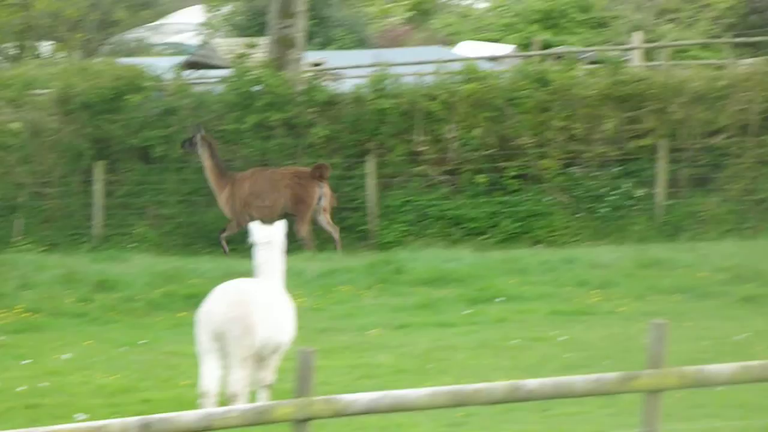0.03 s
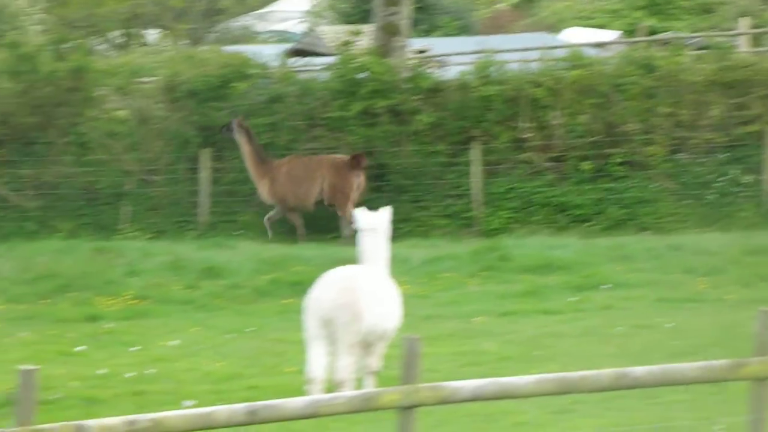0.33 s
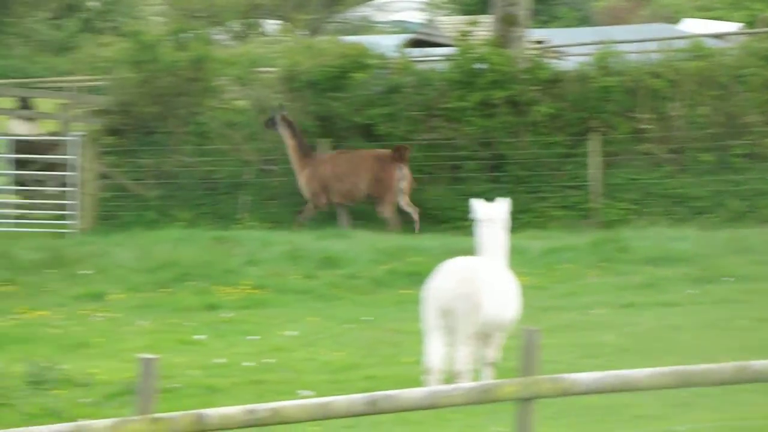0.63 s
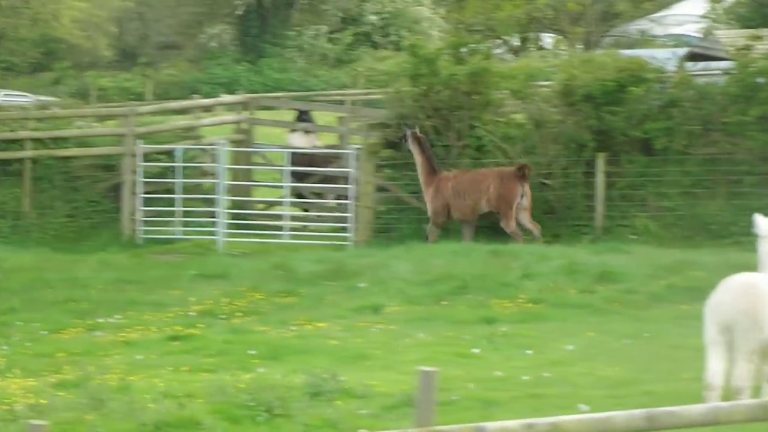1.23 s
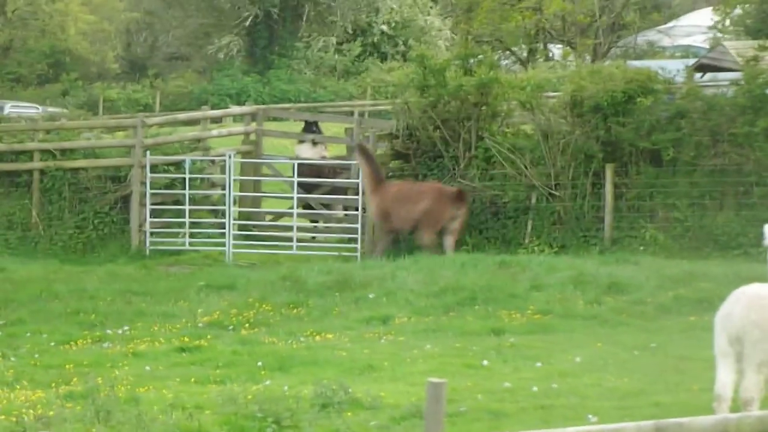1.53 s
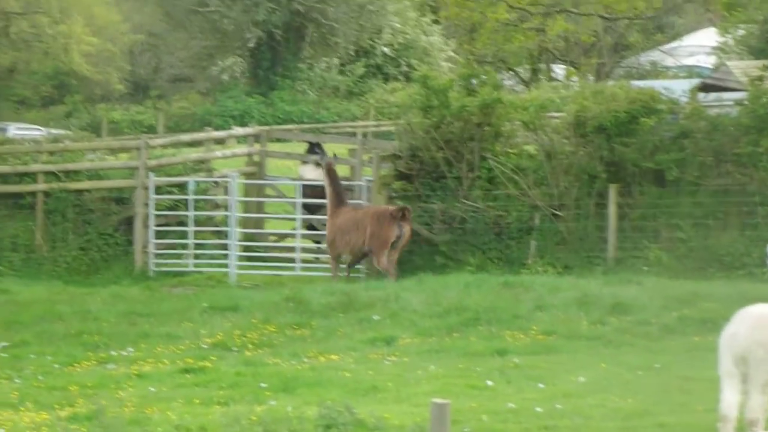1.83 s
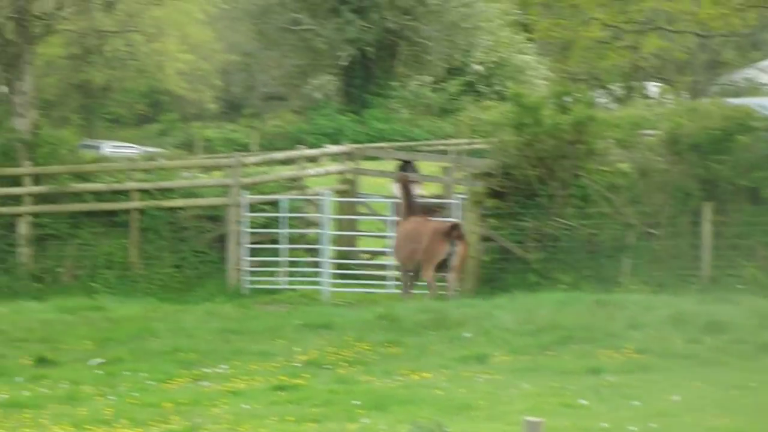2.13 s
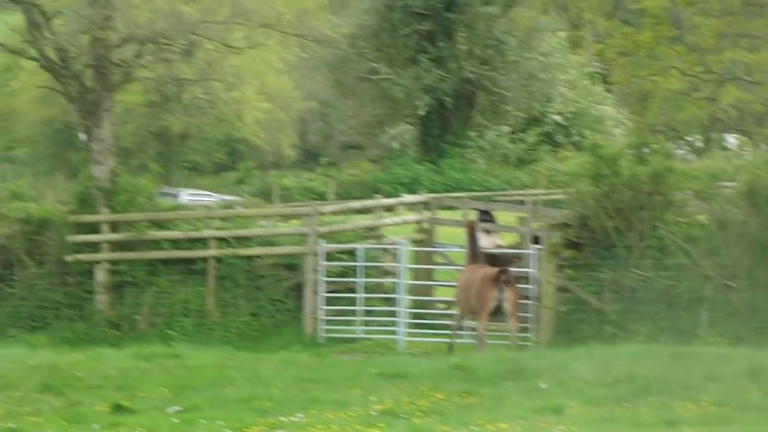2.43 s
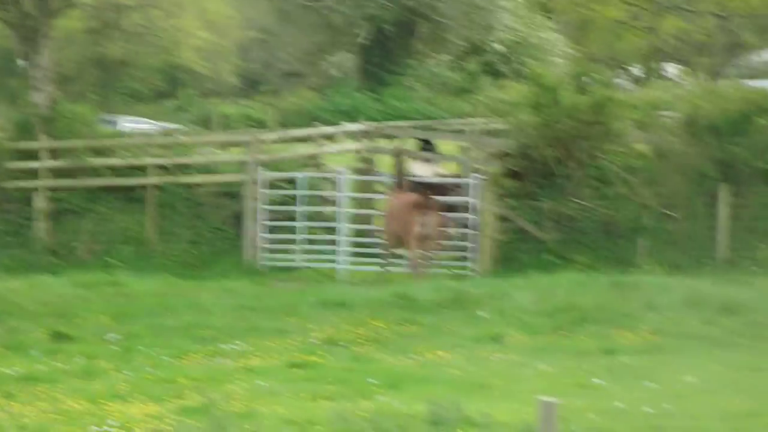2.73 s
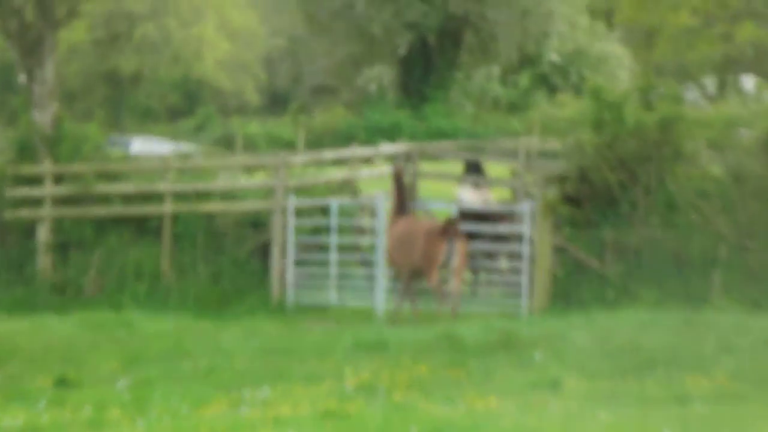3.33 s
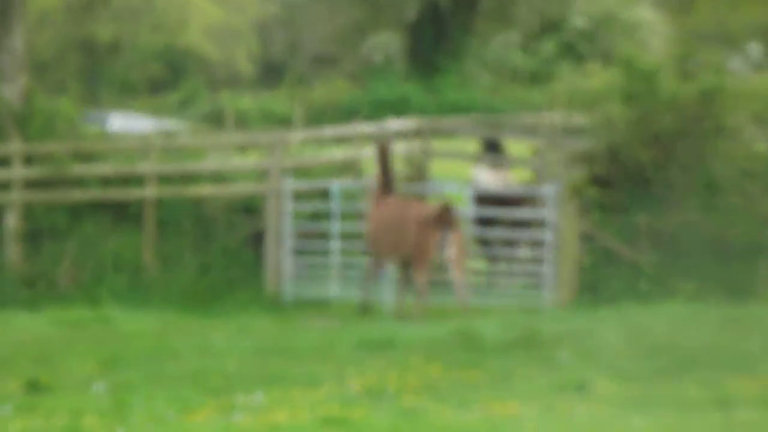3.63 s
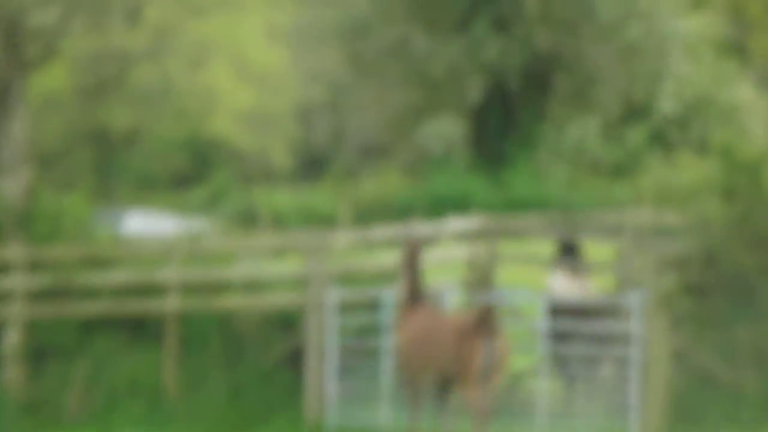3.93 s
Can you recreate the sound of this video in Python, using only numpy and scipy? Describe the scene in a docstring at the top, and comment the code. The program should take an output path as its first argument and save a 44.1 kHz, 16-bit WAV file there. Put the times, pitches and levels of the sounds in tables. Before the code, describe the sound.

Rumbling, gusty wind on a handheld camera's microphone, with case clicks and a late motor rasp.

```python
"""Wind on a handheld camera's microphone in a paddock: rumble, fluttering gusts, puffs, overload thumps.
Handling snaps ring the camera's case hard enough to clip, with soft rubs and a faint creak.
Near the end, a rough rasp, most likely the zoom motor: about 220 ticks a second over gear hiss.
Behind it: faint ticks of a far bird, steady hiss and the camera's thin whine."""
import sys
import numpy as np
from scipy import signal
from scipy.fft import rfft, irfft
from scipy.io import wavfile
from scipy.ndimage import uniform_filter1d

SR = 44100
rng = np.random.default_rng(int(sys.argv[2]) if len(sys.argv) > 2 else 0)


def transcribe(signal):
    """Save signal, clipped to [-1, 1], as a 16-bit WAV file at the path in sys.argv[1]."""
    frames = np.atleast_2d(signal).T
    limited = np.clip(frames, -1, 1)
    pcm = np.round(limited * 32767).astype(np.int16)
    wavfile.write(sys.argv[1], SR, pcm)


N = 176400

# Wind pressure on the microphone (time [s], relative level [dB])
RUMBLE_LEVEL = [(0.0, -18.5), (0.53, -22.5), (0.71, -14), (0.85, -26), (0.88, -18), (0.95, -22),
                (1.14, -15.5), (1.27, -24.5), (1.31, -15.5), (1.36, -21.5), (1.5, -31), (1.76, -21.5),
                (1.82, -16.5), (2.02, -24), (2.09, -17.5), (2.22, -23), (2.27, -16), (2.44, -27.5),
                (2.55, -15), (2.57, -23.5), (2.73, -14), (2.78, -23), (2.95, -25), (3.01, -16), (3.23, -14),
                (3.56, -20.5), (3.62, -15), (3.83, -18), (3.9, -7.5), (4.0, -21.5)]
# Gust strength (time [s], relative level [dB])
GUST_LEVEL = [(0.0, -57), (0.014, -28.5), (0.068, -28.5), (0.178, -44.5), (0.394, -32.5), (0.632, -40.5),
              (0.696, -30), (0.844, -42), (0.868, -22.5), (1.166, -24), (1.278, -39), (1.29, -31.5),
              (1.35, -38), (1.43, -28.5), (1.45, -38.5), (1.5, -24.5), (1.76, -41), (1.8, -24.5),
              (1.84, -42), (1.95, -30), (1.98, -44.5), (2.14, -18.5), (2.18, -46), (2.21, -17.5),
              (2.35, -29.5), (2.37, -48), (2.48, -37), (2.5, -24.5), (2.57, -32.5), (2.71, -16.5),
              (2.83, -37), (2.9, -29), (2.93, -46), (3.04, -21.5), (3.42, -25), (3.45, -41), (3.5, -27.5),
              (3.73, -24), (3.74, -17), (3.78, -30), (3.98, -20), (4.0, -29)]
# Rumble spectrum (frequency [Hz], relative density [dB])
RUMBLE_SPECTRUM = [(5, -29), (18, 0.5), (32, 1.5), (70, 0), (115, -3), (170, -10.5), (300, -34),
                   (700, -57.5), (2000, -90)]
# Gust spectrum (frequency [Hz], relative density [dB])
GUST_SPECTRUM = [(30, -14), (90, -7), (150, 2), (240, -3), (400, -12), (700, -24), (1200, -39), (2500, -92),
                 (8000, -98)]
# Puffs into the microphone port (time [s], length [s], centre [Hz], width [Hz], level [dB])
PUFFS = [(0.868, 0.038, 330, 110, -14.5), (1.018, .04, 310, 112, -19), (2.108, 0.026, 276, 109, -13),
         (2.198, 0.028, 330, 120, -18), (2.203, 0.036, 754, 282, -23), (3.178, 0.043, 507, 222, -22.5)]
# Microphone overloads (time [s], thump [dB], crack [dB])
BUFFETS = [(0.71, -6, -14), (0.8872, -1.5, -10), (1.0515, 0.5, -15), (1.139, -3.5, -13.5),
           (1.1567, -3, -11), (2.1139, -2, -9.5), (2.615, -4, -10.5), (2.7024, -4, -14), (2.722, -5, -14.5),
           (3.0331, -3.5, -10.5), (3.096, -3, -11), (3.1251, -4, -13), (3.2115, -4.5, -13),
           (3.307, -3.5, -14), (3.6295, -5.5, -13), (3.8941, -6.5, -12), (3.9103, -6.5, -13.5)]
# Contacts on the case (time [s], level [dB], main ring [Hz], contact low-pass [Hz])
SNAPS = [(0.7767, 3.5, 2990, 14100), (0.7781, -0.5, 2800, 7960), (0.781, -19, 3130, 3500),
         (0.787, -9, 3060, 6950), (0.8597, -20.5, 2920, 5950), (0.865, -19.5, 2860, 5500),
         (0.9165, -32.5, 2930, 10000), (1.3173, 13.5, 2986, 13200), (1.847, -1.5, 2904, 12500),
         (2.3625, -3.5, 2830, 12200), (2.3629, -3.5, 2810, 7960), (2.4104, -29, 3060, 5500),
         (2.546, -3, 3040, 14000), (2.585, -25, 3150, 5530), (2.692, -22.5, 2700, 3500),
         (2.7851, -7, 2750, 2400), (2.7877, -11, 2950, 2900), (2.92, -24, 2910, 3420),
         (2.964, -23.5, 2380, 2950)]
# Case modes, retuned per snap (nominal frequency [Hz], relative level [dB], t60 [s])
CASE_MODES = [(2925, 5, 0.0097), (1840, -21.5, 0.01), (2860, -32, 0.0083), (3400, 3, 0.0054),
              (4800, -1.5, 0.0051), (7580, -6.5, 0.0076), (8200, -5, .005), (9900, -16, 0.0024),
              (11300, -5, 0.0025), (12200, -5, 0.004)]
# Zoom motor speed (time [s], tick rate [Hz])
MOTOR_SPEED = [(3.05, 165), (3.063, 186), (3.07, 314), (3.095, 256), (3.112, 180), (3.14, 207), (3.21, 218),
               (3.31, 233), (3.345, 188), (3.39, 235), (3.49, 216), (3.6, 209), (3.72, 218), (3.96, 226)]
# Zoom motor level (time [s], ticks [dB], gear hiss [dB])
MOTOR_LEVEL = [(3.048, -46, -67), (3.058, -13, -41), (3.072, -24.5, -31), (3.085, -28, -35),
               (3.135, -31.5, -42), (3.21, -27.5, -39), (3.255, -32, -42), (3.298, -28, -34.5),
               (3.325, -35.5, -41.5), (3.383, -27.5, -39), (3.465, -33, -41), (3.525, -26, -30.5),
               (3.58, -28, -31.5), (3.635, -30, -41.5), (3.72, -28.5, -35), (3.79, -28.5, -34),
               (3.855, -27.5, -28), (3.91, -27.5, -39), (3.94, -38, -47), (3.97, -55, -64)]
# Gear hiss spectrum (frequency [Hz], relative density [dB])
GEAR_SPECTRUM = [(1200, -9), (2200, 8), (2750, 9), (3300, 12.5), (3800, -0.5), (4400, -12), (4900, 0.5),
                 (5250, -1.5), (5550, -6), (5950, 4), (6400, 2.5), (6800, -15), (7250, 2.5), (7600, -3),
                 (7950, -7), (8700, -7), (9200, -6.5), (10400, -18), (11200, -31), (16000, -42)]
# Rubs and rustles (time [s], length [s], centre [Hz], width [Hz], level [dB])
RUBS = [(0.03, 0.08, 7500, 1100, -49), (0.383, .09, 6700, 900, -54), (0.55, 0.057, 7600, 1200, -53),
        (0.655, 0.19, 7540, 1100, -48.5), (0.783, 0.043, 5160, 550, -37), (0.864, 0.014, 4750, 900, -47),
        (1.258, 0.053, 7600, 1200, -45), (1.73, 0.15, 7400, 1200, -51), (2.15, 0.18, 6100, 1600, -53),
        (2.555, 0.13, 5100, 800, -46.5), (2.64, .08, 2850, 220, -32.5), (2.96, .07, 6800, 1200, -48.5)]
# Far bird's ticks (time [s], level [dB])
BIRD_TICKS = [(0.146, -42), (0.171, -43), (0.206, -46), (0.236, -49), (2.227, -45), (2.274, -47)]
# Background hiss spectrum (frequency [Hz], relative density [dB])
HISS_SPECTRUM = [(100, 1), (500, -0.5), (1000, -2), (1500, 1), (2300, 0.5), (2700, 3), (2920, 10),
                 (3130, 3), (3350, 2.5), (3600, -5), (4100, -13), (4900, -24), (6000, -21), (7200, -17.5),
                 (8000, -12), (8700, -23.5), (11000, -27), (15000, -33), (16500, -48.5)]


def amp(db):
    """Decibels to gain."""
    return 10 ** (np.asarray(db) / 20)


def unit_rms(x):
    """Scales to rms 1."""
    return x / np.sqrt(np.mean(x ** 2) + 1e-20)


def curve(table, column=1):
    """One column of a time table at every sample."""
    rows = np.array(table)
    return np.interp(np.arange(N) / SR, rows[:, 0], rows[:, column])


def add(mix, time_s, sound):
    """Mixes a sound in at time_s."""
    part = mix[max(round(time_s * SR), 0):][:len(sound)]
    part += sound[:len(part)]


def shaped_noise(spectrum):
    """Noise with the given spectrum, rms 1."""
    points_hz, points_db = np.transpose(spectrum)
    hz = np.fft.rfftfreq(N, 1 / SR)
    gain = amp(np.interp(np.log(hz + 1), np.log(points_hz), points_db))
    return unit_rms(irfft(rfft(rng.standard_normal(N)) * gain, N))


def band_noise(centre_hz, width_hz):
    """Noise in one Gaussian band, rms 1."""
    hz = np.fft.rfftfreq(N, 1 / SR)
    gain = np.exp(-.5 * ((hz - centre_hz) / width_hz) ** 2)
    return unit_rms(irfft(rfft(rng.standard_normal(N)) * gain, N))


def steadied(x, span_s):
    """Evens out swells slower than span_s."""
    power = uniform_filter1d(x ** 2, max(int(span_s * SR), 2))
    return x / np.sqrt(abs(power) + 1e-9)


def bursts(table):
    """Short rounded noise bursts, each in its own band."""
    out = np.zeros(N)
    for time_s, length_s, centre_hz, width_hz, db in table:
        window = np.hanning(int(length_s * SR)) ** .5
        add(out, time_s, amp(db) * window * unit_rms(band_noise(centre_hz, width_hz)[:len(window)]))
    return out


def wind(rumble_gain_db=2, gust_gain_db=5, flutter_db=4):
    """Deep pressure rumble, fluttering turbulence in the gusts, puffs straight into the port."""
    rumble = steadied(shaped_noise(RUMBLE_SPECTRUM), span_s=.11)
    rumble *= amp(curve(RUMBLE_LEVEL) + rumble_gain_db)
    eddies = shaped_noise(GUST_SPECTRUM) * amp(flutter_db * band_noise(0, width_hz=43))
    gusts = steadied(eddies, span_s=.07) * amp(curve(GUST_LEVEL) + gust_gain_db)
    return rumble + gusts + bursts(PUFFS)


def buffeted(air, thump_width_s=.0017, crack_decay_s=.0018):
    """Each buffet takes over the diaphragm in one low thump and lets go with a small crack."""
    half = SR // 50
    out, t = air.copy(), np.arange(-half, half) / SR
    u = t / thump_width_s
    for time_s, thump_db, crack_db in BUFFETS:
        displaced_air = air[round(time_s * SR) - half:][:len(t)] * np.exp(-.5 * (u / 2) ** 2)
        thump = amp(thump_db) * (1 - u ** 2) * np.exp(-.5 * u ** 2)
        crack = amp(crack_db) * (t >= 0) * np.exp(-abs(t) / crack_decay_s)
        add(out, time_s + t[0], thump - displaced_air - crack)
    return out


def case_snaps(chatter_gain=.092, chatter_decay_s=.0012):
    """A contact and brief chatter ring the case's modes; softer contacts are duller."""
    out, t = np.zeros(N), np.arange(SR // 25) / SR
    for time_s, db, ring_hz, lowpass_hz in SNAPS:
        force = chatter_gain * rng.standard_normal(len(t)) * np.exp(-t / chatter_decay_s)
        force[0] = 1  # first contact
        force = signal.lfilter(*signal.butter(3, lowpass_hz, fs=SR), force)
        tuning = ring_hz / CASE_MODES[0][0]
        ring = sum(amp(mode_db - 60 * t / t60_s) * np.cos(2 * np.pi * hz * tuning * t)
                   for hz, mode_db, t60_s in CASE_MODES)
        snap = signal.fftconvolve(force, ring)[:len(t)]
        onset_amplitude = np.sqrt(2 * np.mean(snap[:SR // 350] ** 2))
        add(out, time_s, amp(db) * snap / onset_amplitude)
    return out


def zoom_motor(ring_hz=2767, width_s=.00056, spread_db=4.5, limp_db=.3, jitter_s=.00012, detune=.015):
    """Uneven ticks, each a few cycles of one resonance, over gear hiss."""
    now, t = np.arange(N) / SR, np.arange(-SR // 300, SR // 300) / SR
    running = (now > MOTOR_LEVEL[0][0]) & (now < MOTOR_LEVEL[-1][0])
    tick_count = np.floor(np.cumsum(curve(MOTOR_SPEED) * running) / SR)
    times_s = now[1:][np.diff(tick_count) > 0]
    gears = shaped_noise(GEAR_SPECTRUM) * amp(curve(MOTOR_LEVEL, column=2))
    scatter = np.clip(rng.standard_normal((len(times_s), 3)), -2, 2)
    window = np.exp(-.5 * (t / width_s) ** 2)
    ticks = np.zeros(N)
    for k, (time_s, (size, late, sharp)) in enumerate(zip(times_s, scatter)):
        tick = window * np.sin(2 * np.pi * ring_hz * (1 + detune * sharp) * t)
        gain = amp(spread_db * size + limp_db * (-1) ** k)
        add(ticks, time_s + t[0] + jitter_s * late, gain * tick)
    ticks *= amp(curve(MOTOR_LEVEL)) / np.std(ticks[running])
    return running * (ticks + gears)


def rubs(grain_db=1.5):
    """Soft, grainy friction noise."""
    return bursts(RUBS) * unit_rms(amp(grain_db * band_noise(0, width_hz=70)))


def creak(start_s=2.223, length_s=.11, pitch_hz=1915, slip_rate_hz=83.6, level_db=-33.5):
    """A quick run of rough slips on one note."""
    out, t = np.zeros(N), np.arange(0, length_s, 1 / SR)
    slips = np.sin(np.pi * slip_rate_hz * t) ** 4 * np.sin(np.pi * t / length_s) ** .5
    note = steadied(band_noise(pitch_hz, width_hz=60), span_s=.0069)[:len(t)]
    add(out, start_s, amp(level_db) * slips * note)
    return out


def bird(decay_s=.005):
    """Thin high ticks from the hedge: fast-decaying narrowband noise."""
    out, t = np.zeros(N), np.arange(SR // 40) / SR
    for time_s, db in BIRD_TICKS:
        note = steadied(band_noise(centre_hz=6750, width_hz=350), span_s=.004)[:len(t)]
        add(out, time_s, amp(db) * np.exp(-t / decay_s) * note)
    return out


def background(hiss_db=-35.5, whine_db=-60):
    """Steady hiss and the camera's thin whine."""
    hiss = shaped_noise(HISS_SPECTRUM)
    whine = steadied(band_noise(centre_hz=8022, width_hz=10), span_s=.077)
    return amp(hiss_db) * hiss + amp(whine_db) * whine


def scene():
    """All sources at one microphone, on both channels."""
    mono = buffeted(wind()) + case_snaps() + zoom_motor() + rubs() + creak() + bird() + background()
    return np.array([mono, mono])


def record(dry):
    """Full-scale clip, one-sample lag on the left, low-pass."""
    cutoff_hz = 15700
    left, right = np.clip(dry, -1, 1)
    pair = np.array([np.append(0, left[:-1]), right])
    lowpass = signal.firwin(511, cutoff_hz, window=("kaiser", 9), fs=SR)
    return signal.oaconvolve(pair, lowpass[None], "same", axes=1)


dry = scene()
out = record(dry)
transcribe(out)
```